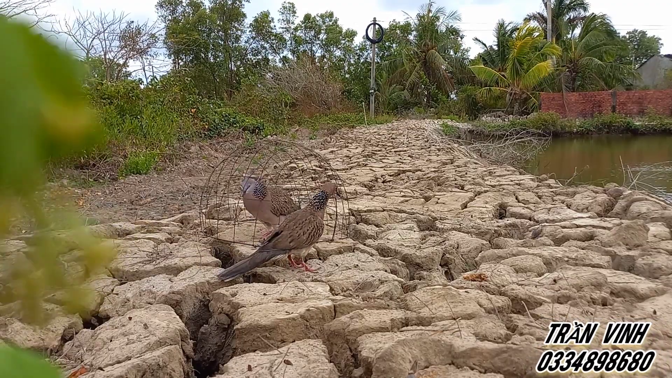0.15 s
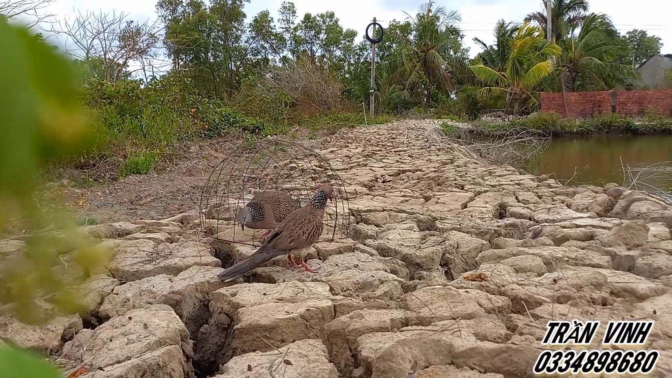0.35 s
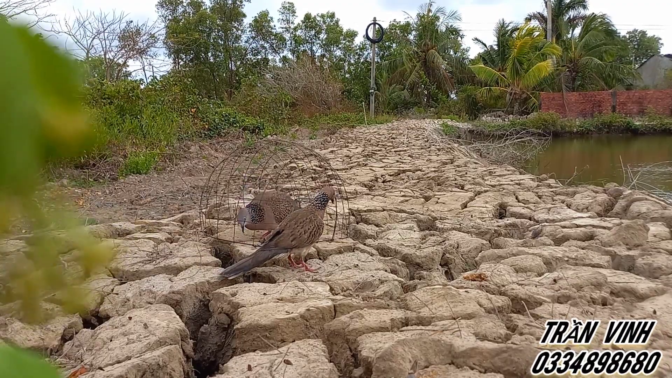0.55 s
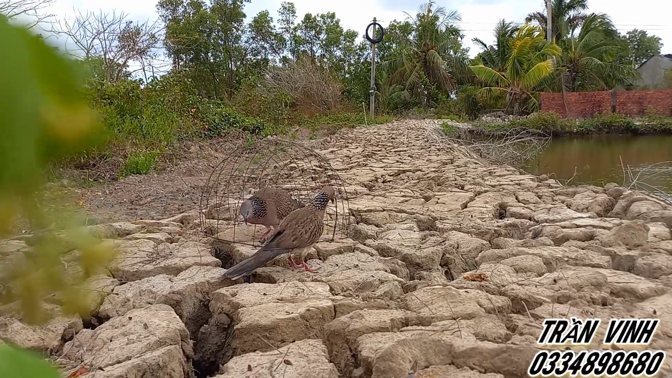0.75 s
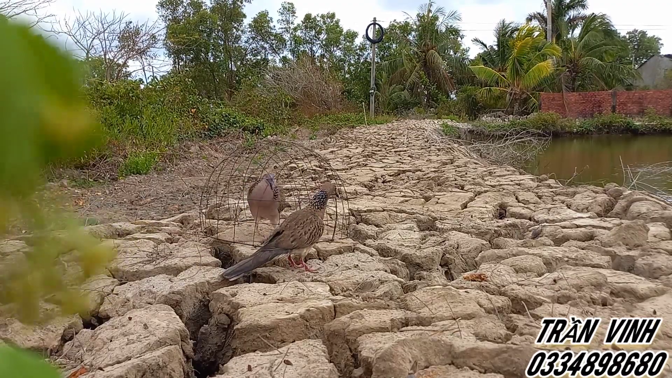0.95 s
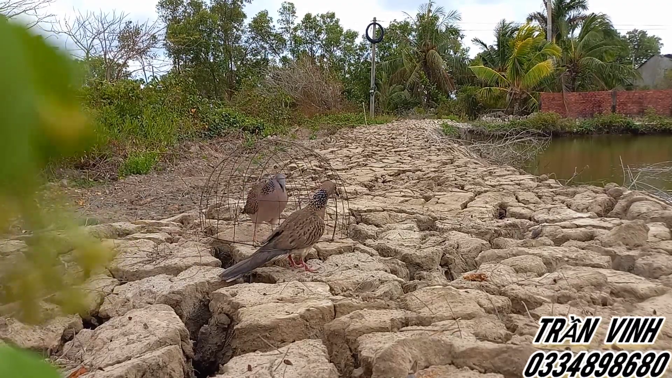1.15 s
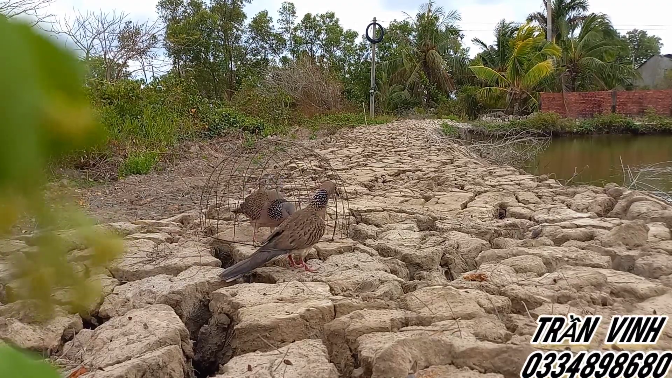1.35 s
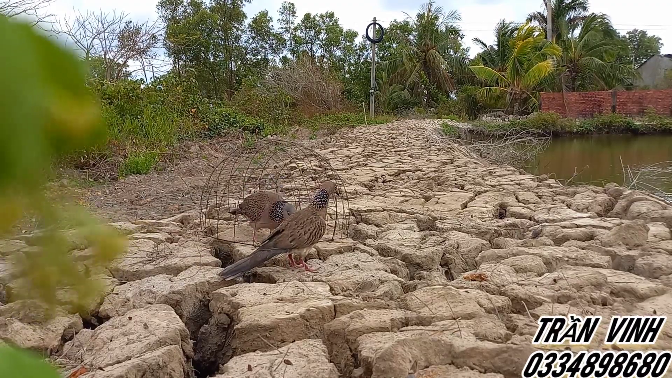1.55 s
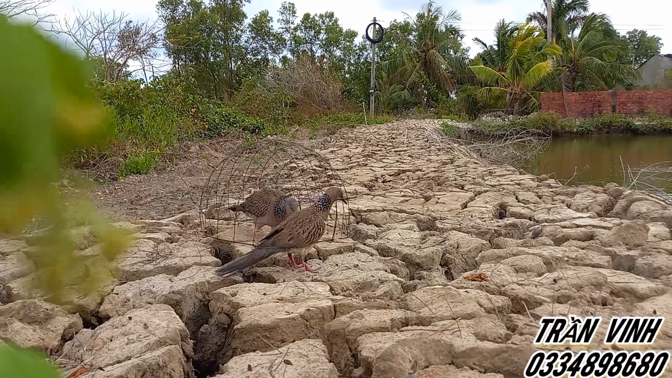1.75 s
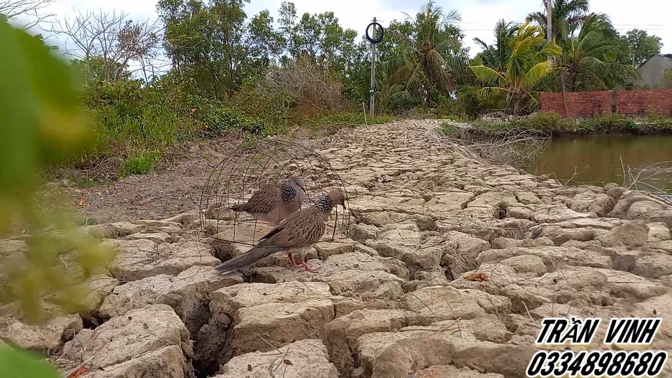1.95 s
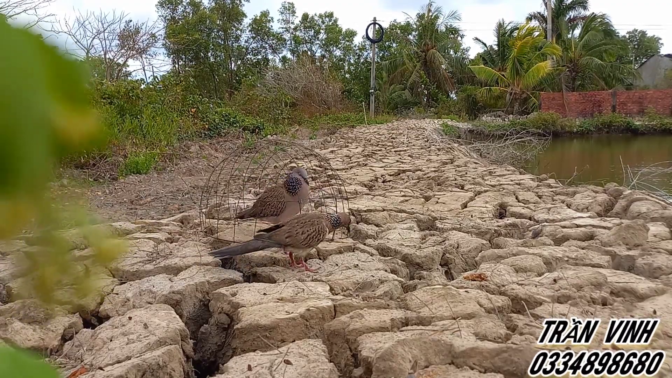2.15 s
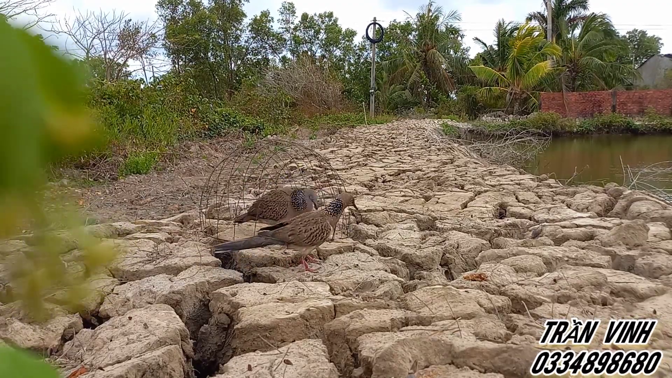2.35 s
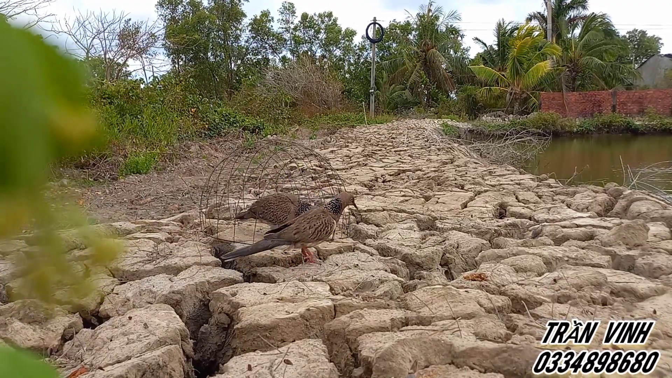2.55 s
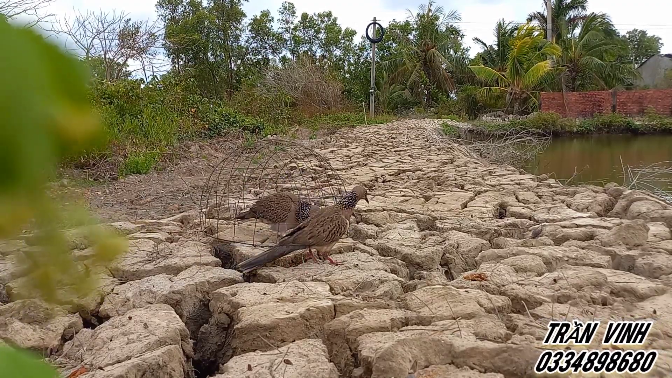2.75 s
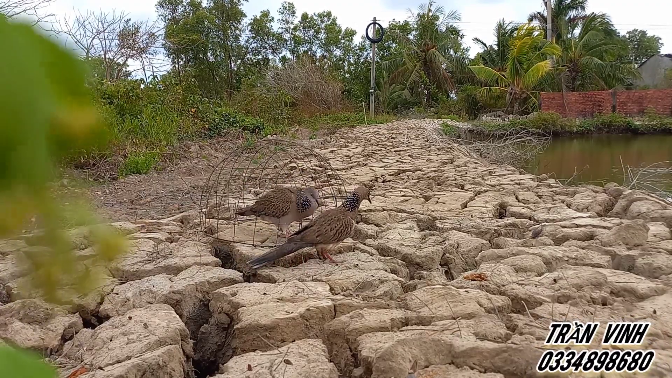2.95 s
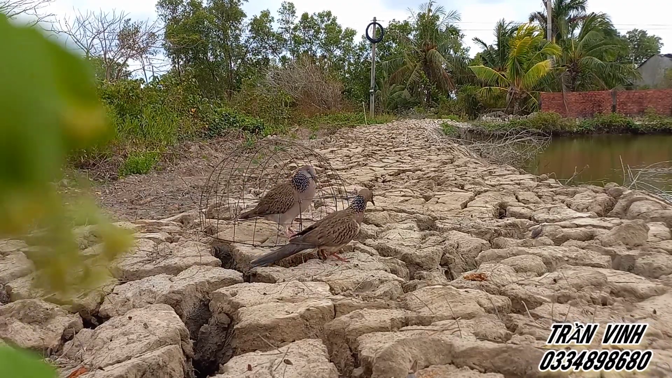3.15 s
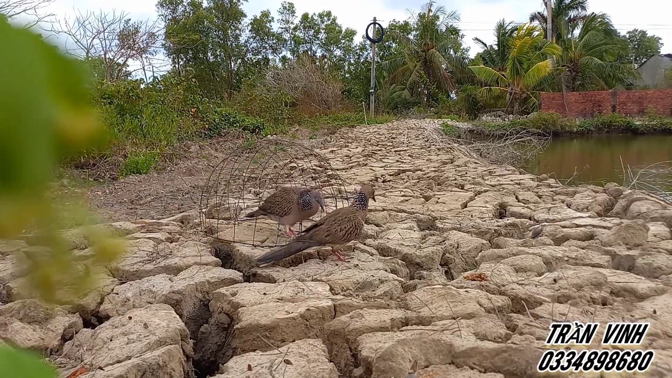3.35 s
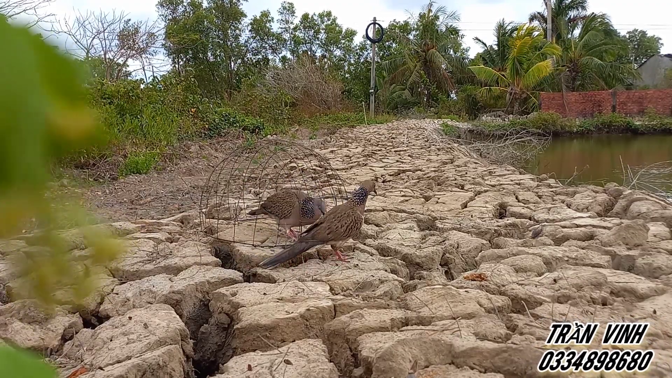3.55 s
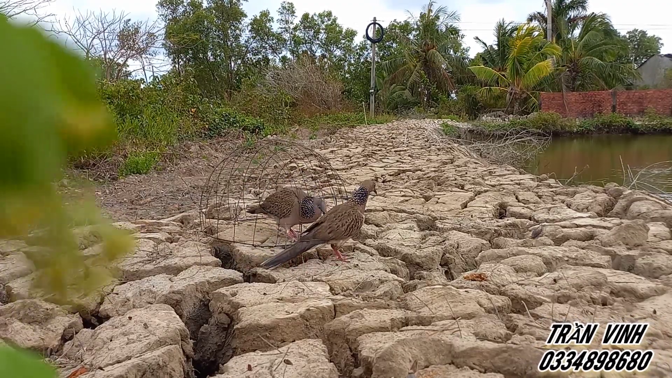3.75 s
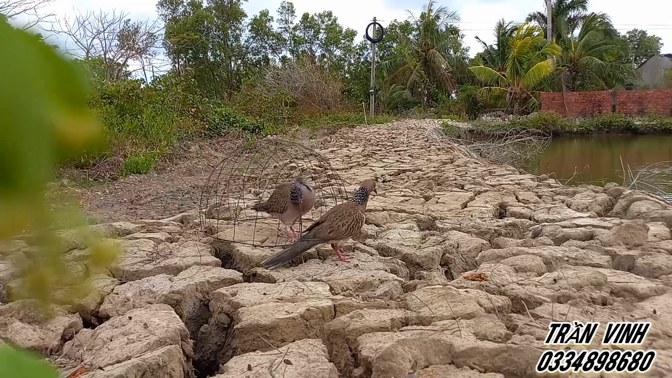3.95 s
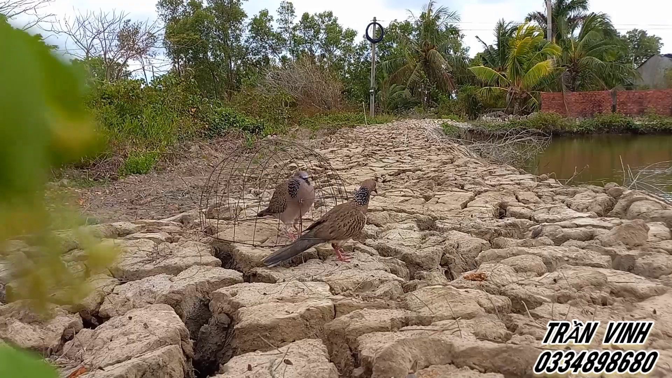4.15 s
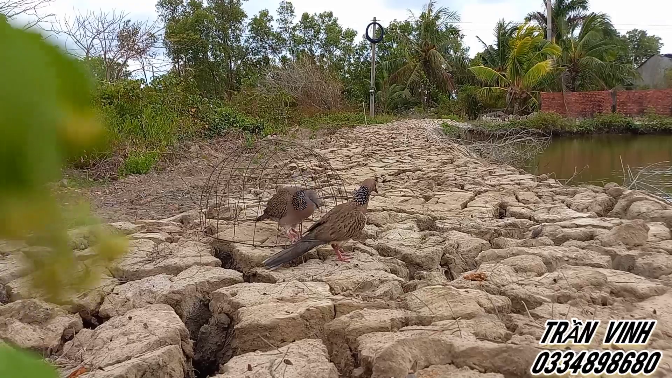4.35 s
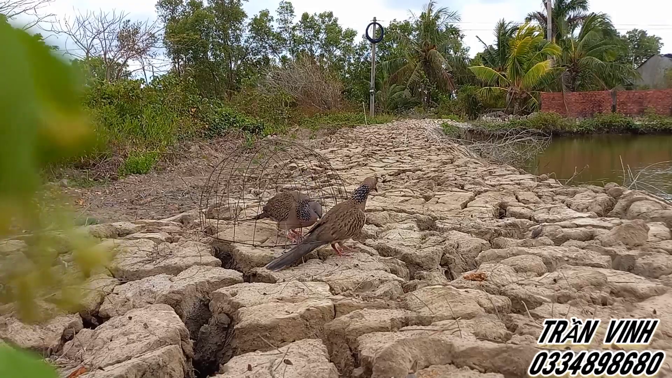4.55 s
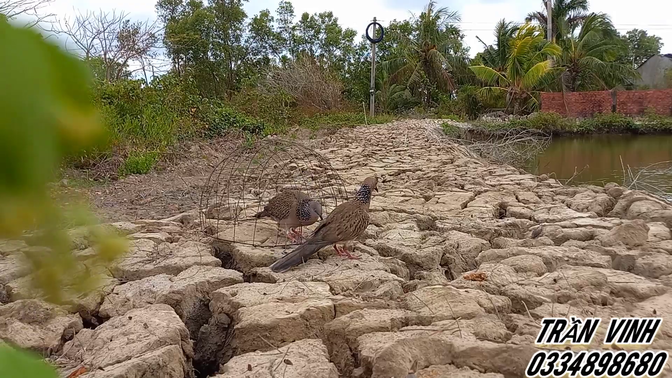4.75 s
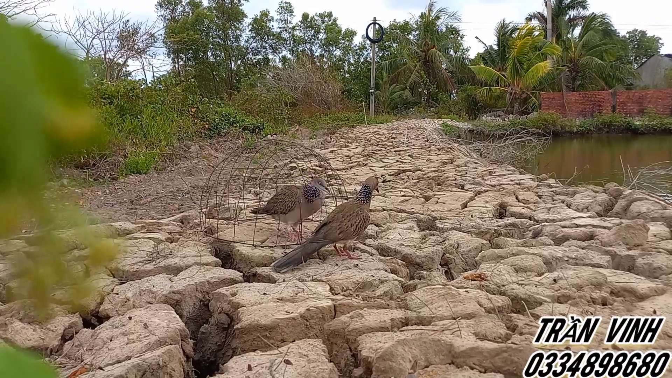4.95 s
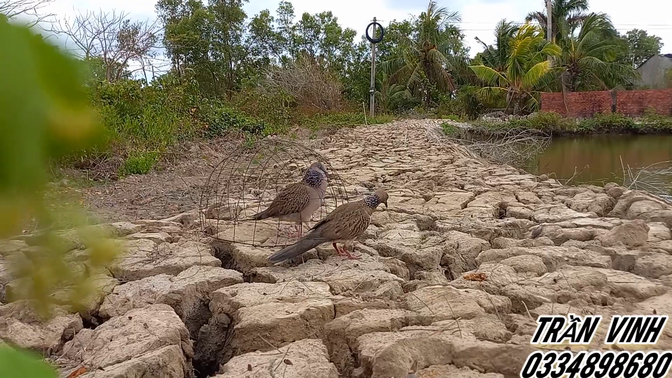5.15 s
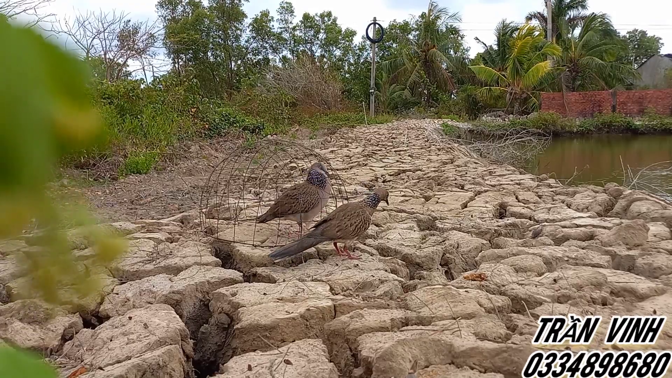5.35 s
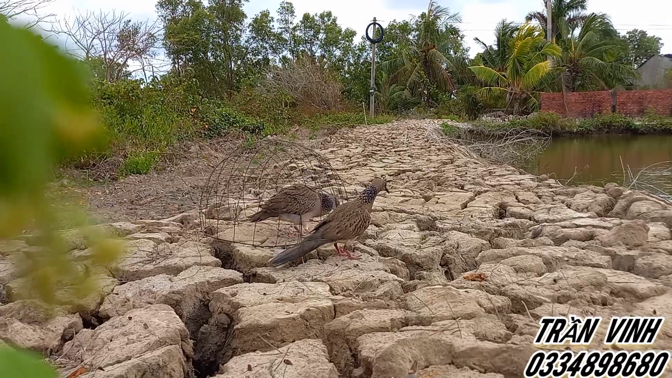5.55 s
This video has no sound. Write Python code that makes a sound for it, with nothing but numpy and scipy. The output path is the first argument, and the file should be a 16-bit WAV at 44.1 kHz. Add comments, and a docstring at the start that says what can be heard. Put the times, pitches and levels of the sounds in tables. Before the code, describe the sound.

A spotted dove a few steps from the microphone gives five evenly repeated coos. Each begins with a brief rolling purr, pauses, then a longer purr smooths into a clear, hollow tone that swells, sags and breaks off softly. Behind it lie restless low outdoor rumble, faint hum, thin hiss, a soft scuff and tiny dry ticks. Open air, almost no echo.

```python
"""On dry mud beside a pond, a spotted dove a few steps away bows and coos five times.
Each phrase is a short purring note and a long one, whose purr clears into a pure tone that swells, sags
and breaks to a soft tail. The coos are gliding tones, chopped into quick puffs where they purr.
Shaped noise makes the low outdoor rumble, thin hiss, two soft scuffs and a few tiny ticks behind them;
a wavering sine makes the faint hum."""
import sys
import numpy as np
from scipy import signal
from scipy.fft import rfft, irfft, next_fast_len
from scipy.io import wavfile
from scipy.ndimage import uniform_filter1d, map_coordinates

SR = 44100
rng = np.random.default_rng(int(sys.argv[2]) if len(sys.argv) > 2 else 0)


def put_to_file(sound):
    """Save the sound as 16-bit audio at rate SR, in the file named by the first command-line argument."""
    columns = np.atleast_2d(sound).T  # one column per channel
    safe = np.clip(columns, -1, 1)
    whole_steps = np.round(safe * 32767)
    wavfile.write(sys.argv[1], SR, whole_steps.astype(np.int16))


N = 251370  # length of the scene [samples]


def amp(db):
    """Turn decibels into a plain multiplier."""
    return 10 ** (np.asarray(db) / 20)


def unit(x):
    """Scale x to an average (rms) strength of 1."""
    return x / np.sqrt(np.mean(np.abs(x) ** 2) + 1e-20)


def along(points, hz):
    """Read a curve of (frequency [Hz], value) points, with frequency on a log axis."""
    f, v = np.transpose(points)
    return np.interp(np.log(hz + 1), np.log(f + 1), v)


def curves(rows, t):
    """Read each column after the time column at the times t."""
    s, *columns = np.transpose(rows)
    return [np.interp(t, s, column) for column in columns]


def wobble(rate, t):
    """Draw a smooth random curve through `rate` random points a second."""
    return map_coordinates(rng.standard_normal(4096), [(t - t[0]) * rate], mode="wrap")


def ramp(t, start, length):
    """Stay at 0 before start, then rise to 1 over length."""
    return np.clip((t - start) / length, 0, 1)


def filtered(x, response):
    """Multiply the frequencies of x by a response."""
    m = next_fast_len(N + SR // 2)
    return irfft(rfft(x, m) * response(np.fft.rfftfreq(m, 1 / SR)), m)[..., :N]


def coloured(x, spectrum):
    """Filter x by a curve of (frequency [Hz], gain [dB])."""
    return filtered(x, lambda hz: amp(along(spectrum, hz)))


def noise(spectrum, alike):
    """Make stereo noise of rms 1; a shared part and an opposed part set how alike the two sides are."""
    def mid_side_gains(hz):
        turn = np.arccos(np.clip(along(alike, hz), -1, 1)) / 2
        return amp(along(spectrum, hz)) * [np.cos(turn), np.sin(turn)]

    mid, side = filtered(rng.standard_normal((2, N)), mid_side_gains)
    return unit(np.array([mid + side, mid - side]))


def background(effort, hum_hz=125, hum_db=-7, air_db=-69.0, bright_db=-79, restless_db=2,
               rush_db=-72, coo_rush_db=-42, rush_growth=0.55):
    """Restless rumble with a wavering hum, a rush that swells with each coo, and hiss with a bright flicker."""
    # base level of the distant rumble: (time [s], level [dB])
    rumble_path = [(0.0, -57), (0.13, -49.5), (0.54, -60), (0.76, -50), (1.27, -60), (1.78, -56),
                   (2.3, -66.5), (2.41, -56.5), (2.87, -52.5), (2.94, -62.5), (3.32, -51), (3.71, -66),
                   (3.86, -62.5), (3.95, -46.5), (4.16, -61), (4.43, -56), (4.46, -50), (4.7, -55.5),
                   (4.97, -52.5), (5.26, -67.5), (5.68, -59), (5.7, -62.5)]
    # relative colours of rumble, rush, steady hiss and bright band: (frequency [Hz], level per Hz [dB])
    rumble_colour = [(20, -28.5), (42, -22.5), (65, 2.5), (95, 1.5), (130, 6.5), (165, -6), (230, -4.5),
                     (400, -47.5)]
    rush_colour = [(130, -16), (210, -8), (350, -1), (500, -7), (700, -11.5), (1100, -19.5), (2000, -48)]
    air_colour = [(200, -2), (500, -5.5), (800, -0.5), (1200, -1), (1900, 1.5), (2600, -4), (3300, -6.5),
                  (4000, -9), (4900, -8.5), (5800, -11.5), (7200, -10.5), (10000, -11.5), (15500, -14.5)]
    bright_colour = [(7000, -30), (8000, -7), (8450, 0), (8950, -4), (9500, -14), (10500, -30)]
    # how alike the steady hiss is on the two sides: (frequency [Hz], likeness [-1 to 1])
    air_likeness = [(60, 0.28), (180, 0.21), (550, 0.24), (1650, -0.6), (4970, -0.23), (15000, 0.11)]
    t = np.arange(N) / SR

    rumble_level, = curves(rumble_path, t)
    rumble_level = rumble_level + restless_db * wobble(14, t)
    hum_gain = amp(hum_db + 3.6 * wobble(5.6, t))  # relative to the rumble
    hum = hum_gain * np.sin(2 * np.pi * np.cumsum(hum_hz + 3 * wobble(9.4, t)) / SR)
    rumble = amp(rumble_level) * (noise(rumble_colour, [(60, 0.73), (200, 0.36)]) + hum)

    swell = np.abs(uniform_filter1d(effort, size=3000)) ** rush_growth
    rush_gain = amp(rush_db) + amp(coo_rush_db) * swell
    rush = rush_gain * noise(rush_colour, [(200, .55), (800, 0.86)])

    air = amp(air_db) * noise(air_colour, air_likeness)
    bright = amp(bright_db + 1.1 * wobble(12, t)) * noise(bright_colour, [(8000, 0.088)])
    # rumble and bright band lean left, the rush leans right
    return (rumble + bright) * amp([[2.5], [-2.5]]) + rush * amp([[-1], [1]]) + air


def scuffs():
    """Dull noise swells and fades briefly, like a soft rustle."""
    # the scuffs: (time [s], half length [s], level [dB])
    scuff_times = [(0.074, 0.02, -54), (0.86, 0.11, -41.5)]
    # their relative colour: (frequency [Hz], level per Hz [dB])
    scuff_colour = [(200, -32.5), (320, -1), (420, 0.5), (540, -9), (800, -16.5), (1500, -51.5)]
    t = np.arange(N) / SR
    swell = sum(amp(db) * np.exp(-((t - s) / half) ** 2) for s, half, db in scuff_times)
    return swell * noise(scuff_colour, [(400, 0.74)])


def ticks():
    """Each dry tick is a few milliseconds of bright crackle that dies at once."""
    # the ticks, before the lift and filter below: (time [s], level [dB])
    tick_times = [(0.1875, -52), (0.6075, -56), (0.9966, -61), (1.2211, -54), (1.3194, -57), (2.3311, -58),
                  (3.2864, -56), (3.4186, -58), (3.9055, -55), (4.3046, -57), (4.9636, -57)]
    # filter that brightens them: (frequency [Hz], gain [dB])
    tick_colour = [(2000, -25), (5500, -14), (7000, -3), (8600, 0), (11000, -6), (15000, -16)]
    out, t = np.zeros((2, N)), np.arange(SR // 20) / SR
    for s, db in tick_times:
        fade = amp(db + 9 - 60 * t / .01)  # 60 dB down in 10 ms
        out[:, round(s * SR):][:, :len(t)] += fade * rng.standard_normal((2, len(t)))
    return coloured(out, tick_colour)


def gesture(t, pitch, level_db, rough):
    """Scoop up into a note and drop away at its close; rows of (s, pitch Hz, level dB, roughness)."""
    attack_s, scoop_hz, attack_db = .025, 157.3, 19
    release_s, release_db, drop_s, drop_hz = .025, 20.5, .034, 220
    opening = 1 - ramp(t, t[0], attack_s)
    closing = ramp(t, t[-1] - release_s, release_s)
    # the pitch gives way before the level
    dropping = ramp(t, t[-1] - drop_s, drop_s)
    pitch = pitch - scoop_hz * opening - drop_hz * dropping ** 1.4
    level_db = level_db - attack_db * opening - release_db * closing ** 2.8
    # the membranes flutter less at the soft edges of a note
    return np.transpose([t, pitch, level_db, rough * (1 - .8 * (opening + closing))])


def short_note(start, end, hz, dip_hz, db, rough):
    """A purr dips in pitch midway and grows louder until just before it ends."""
    swell_db_per_s, crest_s = 66.5, 0.035  # the crest comes this long before the end
    t = np.linspace(start, end, 400)
    pitch = hz - dip_hz * np.sin(np.pi * ramp(t, start, end - start)) ** 4
    level_db = db - swell_db_per_s * np.maximum(end - crest_s - t, 0)
    return gesture(t, pitch, level_db, rough)


def long_note(start, clears, breaks, end, hz, db, swell_db):
    """A climbing purr leads to a clear tone that sags as it swells, then breaks to a soft tail."""
    # the purr starts lower and softer than the clear tone and climbs towards it
    purr_below_hz, purr_climb_hz, purr_softer_db, purr_rough, clearing_s = 74, 41.7, 8, 1, .016
    # the clear tone sags steadily, then bends down faster as it swells
    sag_hz, bend_hz, bend_power, swell_power, clear_rough = 42.4, 43, 7.8, 3.4, 0.019
    # the voice breaks to a soft low tail that sinks on
    break_s, break_hz, break_db, tail_hz_per_s, tail_db_per_s = 0.011, 58, 6, 650, 100.5
    t = np.linspace(start, end, 800)
    purr = ramp(t, start, clears - start)
    clear = ramp(t, clears, breaks - clears)
    purring = 1 - ramp(t, clears - clearing_s, clearing_s)
    broken = ramp(t, breaks, break_s)
    tail_s = np.maximum(t - breaks, 0)

    pitch = hz - purring * (purr_below_hz - purr_climb_hz * purr ** 3)
    pitch = pitch - sag_hz * clear - bend_hz * clear ** bend_power
    pitch = pitch - break_hz * broken - tail_hz_per_s * tail_s

    swell = np.sin(np.pi / 2 * clear ** swell_power) ** 2
    level_db = db - purr_softer_db * (1 - purr) ** 2.1 + swell_db * swell
    level_db = level_db - break_db * broken - tail_db_per_s * tail_s
    # the purr grows smoother as it nears the clear tone
    rough = clear_rough + purr_rough * purring * (1 - 0.44 * purr ** 2)
    return gesture(t, pitch, level_db, rough)


def flutter(t, rough, first_rate, last_rate, jitter=.14, width=0.002, arch_hz=130, scatter_hz=26,
            size_db=1, rebound_db=-10, sag_hz=130):
    """The voice box opens in quick puffs that arch up in pitch; roughness makes their phase slip."""
    # rates are in puffs a second, width in seconds
    rate = np.linspace(first_rate, last_rate, len(t)) * np.exp(jitter * wobble(70, t))
    count = np.cumsum(rate) / SR
    beats = np.interp(np.arange(1, count[-1]), count, t)
    size, detune, slip, hold, kick = rng.standard_normal((64, 5))[:len(beats)].T[:, :, None]
    # as pressure builds through the note, some puffs stay open longer
    progress = np.linspace(0, 1, len(beats))[:, None]
    length = width * (1 + .9 * progress ** 2 * np.abs(hold))

    def opening(v):
        return 1 / np.cosh(np.clip(v, -50, 50))

    u = t - beats[:, None]
    arch = arch_hz * (2 * length * np.arctan(np.tanh(u / length / 2)) - u * np.pi / 4)
    turns = .5 * slip * np.interp(beats, t, rough)[:, None] + scatter_hz * detune * u
    puff = opening(u / length) * np.exp(2j * np.pi * arch)
    # half a cycle later the membranes rebound, usually weaker, and lower
    late = u - .5 / first_rate
    rebound_gain = amp(rebound_db + 4.8 * kick) * opening(late / width)
    rebound = rebound_gain * np.exp(2j * np.pi * (kick - sag_hz * late))
    puffs = amp(size_db * size) * (puff + rebound) * np.exp(2j * np.pi * turns)
    return unit(np.sum(puffs, axis=0))


def note(rows, first_rate, last_rate, waver=0.002, shimmer=.02, octave_db=-37, slack_db=32):
    """A nearly pure tone is chopped into puffs where rough; returns sound, loudness and purr loudness."""
    # the tone catches for an instant: (time [s], depth [0 to 1])
    catch_times = [(0.717, .9), (.785, 1), (0.817, 0.3), (3.875, 1), (4.789, 0.9), (4.811, 0.8)]
    span = np.arange(round(rows[0][0] * SR) - 128, round(rows[-1][0] * SR) + 128)
    t = span / SR
    pitch, level_db, rough = curves(rows, t)
    rough = np.clip(rough, 0, 1)
    loud = amp(level_db) * signal.windows.tukey(len(t), 500 / len(t))
    # complex tones: the real part is heard, the size is the loudness
    carrier = np.exp(2j * np.pi * np.cumsum(pitch * (1 + waver * wobble(180, t))) / SR)
    steady = 1 + shimmer * wobble(97, t)
    for s, depth in catch_times:
        # the tone thins out and its phase swings before it recovers
        u = (t - s) / .002
        steady = steady * (1 - depth * np.exp(-(u / 4) ** 2) / (1 + 1j * u))
    # even a mildly rough voice is chopped right through
    chop = np.minimum(1.5 * rough, 1)
    swing = (1 - chop) * steady + chop * flutter(t, rough, first_rate, last_rate)
    # air held back in a gap is spent in the next puff, so the smoothed power stays even
    power = uniform_filter1d(uniform_filter1d(np.abs(swing) ** 2, size=900), size=500)
    tone = carrier * swing / np.sqrt(np.abs(power) + 1e-6)
    # the octave grows with loudness, and flares where the pitch is low and the membranes slack
    slack = np.clip(np.log2(560 / pitch) * 3, 0, 1)
    octave_gain = amp(octave_db + slack_db * slack) * np.sqrt(loud / loud.max()) * (1 - rough / 2)
    octave = octave_gain * tone ** 2  # squaring doubles the pitch
    out = np.zeros((3, N))
    out[:, span] = loud * [np.sqrt(2) * (tone + octave).real, np.abs(tone), rough * np.abs(tone)]
    return out


def dove(purr_rasp_db=-26, clear_rasp_db=-43):
    """The puffed-up throat rounds off the notes; each puff of the purr carries a little rasp."""
    # short notes, before edges and throat shape them: (start [s], end [s], pitch [Hz],
    # midway pitch dip [Hz], crest level [dB], roughness [0 to 1])
    short_notes = [ (0.195, 0.382, 679, 64.8, -20.5, .5), (1.230, 1.416, 669, 30.14, -21, .8),
                   (2.343, 2.523, 678.5, 24.84, -22.5, .8), (3.294, 3.471, 684, 44.7, -23, 0.78),
                   (4.314, 4.494, 682, 34.74, -22.5, 0.8)]
    # long notes, before the throat: (start [s], purr clears [s], voice breaks [s], end [s],
    # pitch on clearing [Hz], level on clearing [dB], later swell [dB], base octave level [dB])
    long_notes = [ (0.52, 0.725, 0.88, 0.972, 755.4, -21.5, 4.5, -38.5),
                  (1.550, 1.816, 1.935, 2.017, 743.4, -21.5, 5, -35.5),
                  (2.65, 2.86, 3.008, 3.080, 742.8, -23.5, 4.5, -41),
                  (3.594, 3.775, 3.944, 4.013, 747.6, -23, 5, -37.5),
                  (4.619, 4.78, 4.981, 5.054, 749.6, -24, 5, -36)]
    # filter of the throat: (frequency [Hz], gain [dB])
    throat_colour = [(150, -34), (330, -11), (470, -7.5), (600, 1), (780, 2), (950, -9.5), (1250, -10),
                     (1550, -6.5), (2000, -31), (3500, -66.5)]
    # relative colour of the breathy rasp: (frequency [Hz], level per Hz [dB])
    rasp_colour = [(200, -25), (380, -1.5), (600, -6), (900, 5), (1100, -5), (1300, -21), (1700, -33.5),
                   (3000, -43.5)]
    short = sum(note(short_note(*row), first_rate=93, last_rate=104) for row in short_notes)
    long = sum(note(long_note(*row), first_rate=85, last_rate=78, octave_db=octave_db)
               for *row, octave_db in long_notes)
    tone, effort, purr = short + long
    rasp_gain = amp(purr_rasp_db) * purr + amp(clear_rasp_db) * effort
    rasp = rasp_gain * noise(rasp_colour, [(300, .1), (1000, .5)])
    return coloured(tone, throat_colour), rasp, effort


def hiss(effort, hiss_db=-62, growth=0.27):
    """A thin noise swells with each coo, growing more gently than the coo itself."""
    # its relative colour: (frequency [Hz], level per Hz [dB])
    hiss_colour = [(700, -22), (1200, 3), (2000, 10), (3000, 2), (4000, -6), (5100, -0.5), (5900, -4),
                   (6450, 2.5), (7200, -2.5), (8500, 4), (9600, 1), (15500, -1)]
    swell = np.abs(uniform_filter1d(effort, size=1500)) ** growth
    return amp(hiss_db) * swell * noise(hiss_colour, [(1000, 0.73), (4000, .05)])


def echo(x):
    """Banks and trees answer faintly: a dying noise tail, different at each ear, smears the sound."""
    # how fast the echo dies: (frequency [Hz], time to fall 60 dB [s])
    bank_decay = [(200, .2), (700, .2), (4000, .12)]
    hz, t, z = signal.stft(rng.standard_normal((2, SR // 2)), SR, nperseg=256)
    fade = amp(-60 * t / along(bank_decay, hz)[:, None])
    tail = signal.istft(z * fade, SR, nperseg=256)[1]
    return signal.fftconvolve(x[None], tail / np.linalg.norm(tail[0]), axes=1)[:, :N]


def scene():
    """The dove stands straight ahead in open air, with the other sounds added around it."""
    coo, rasp, effort = dove()
    # a weak reflection from the cracked mud, 4 ms late, colours the two sides differently
    bounce = amp(-28.0) * filtered(coo, lambda hz: np.exp(-2j * np.pi * hz * .004))
    bird = coo + rasp + bounce * np.array([[1], [-1]]) + amp(-27.5) * echo(coo)
    return bird + hiss(effort) + ticks() + scuffs() + background(effort)


def record(dry):
    """Remove everything from the top frequency upwards."""
    top_hz = 15720
    return filtered(dry, lambda hz: hz < top_hz)


dry = scene()
out = record(dry)
put_to_file(out)
```